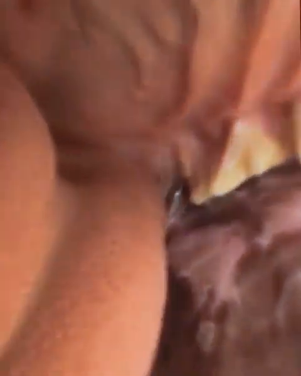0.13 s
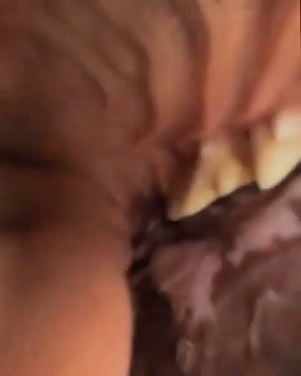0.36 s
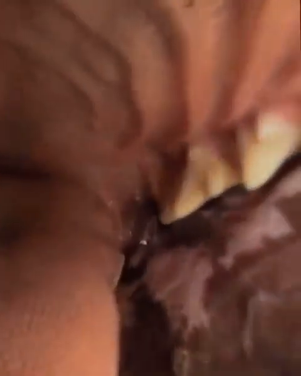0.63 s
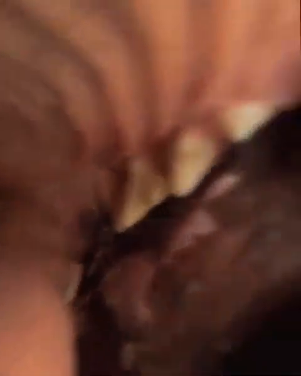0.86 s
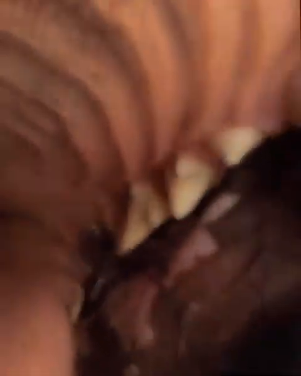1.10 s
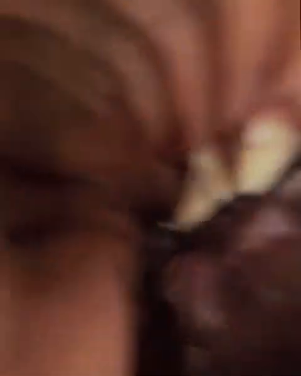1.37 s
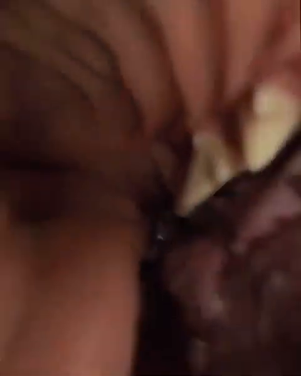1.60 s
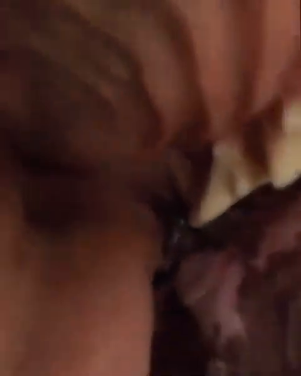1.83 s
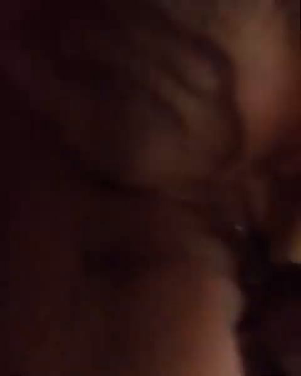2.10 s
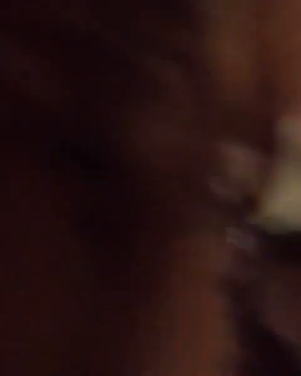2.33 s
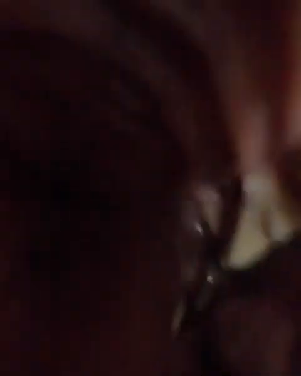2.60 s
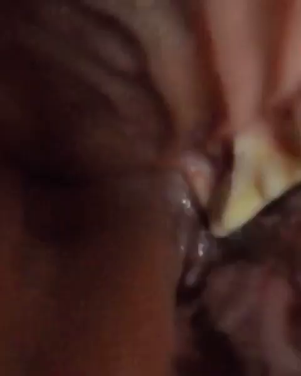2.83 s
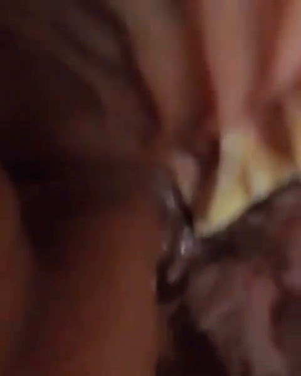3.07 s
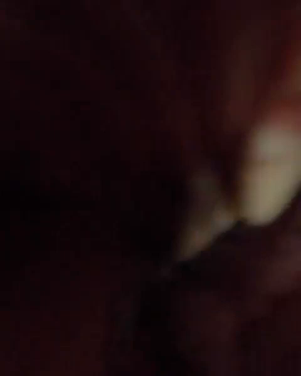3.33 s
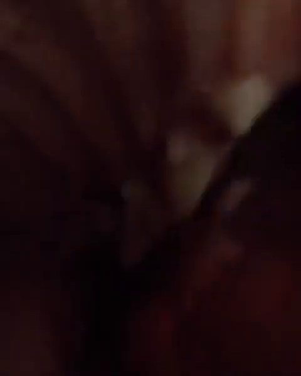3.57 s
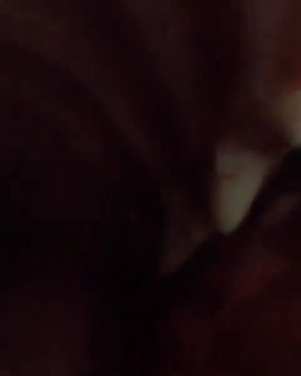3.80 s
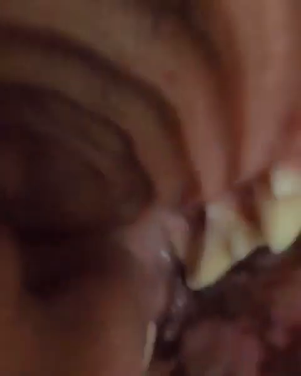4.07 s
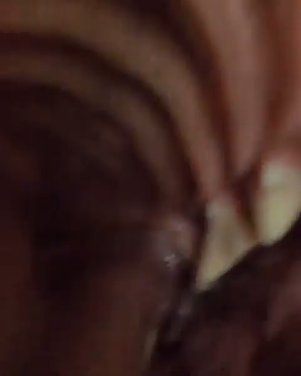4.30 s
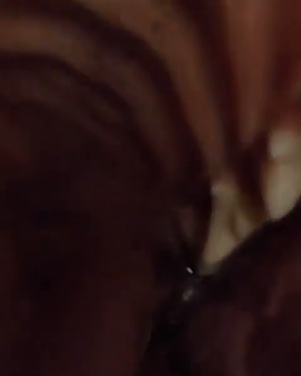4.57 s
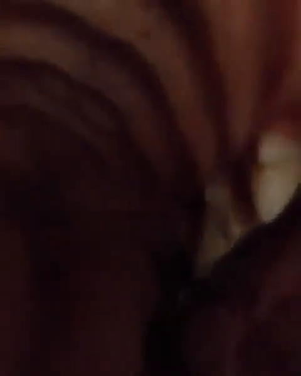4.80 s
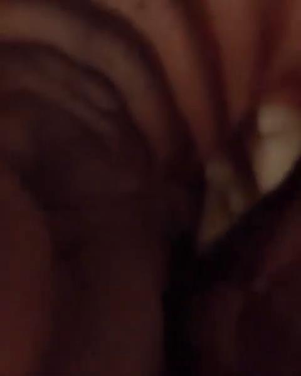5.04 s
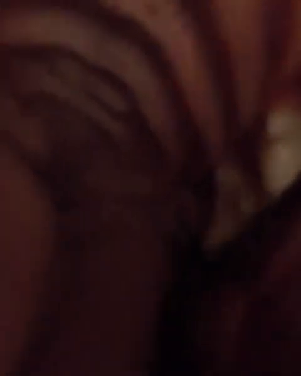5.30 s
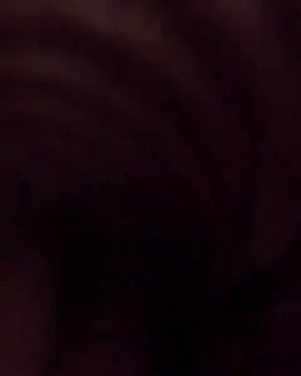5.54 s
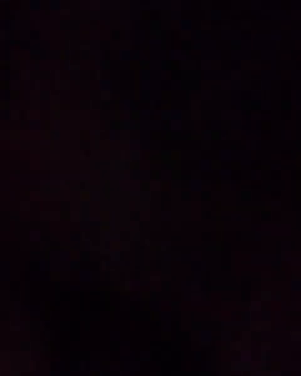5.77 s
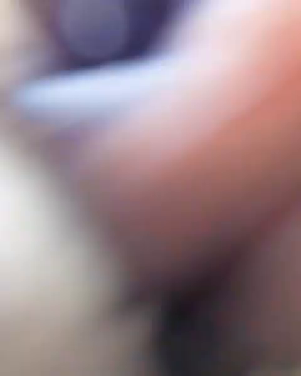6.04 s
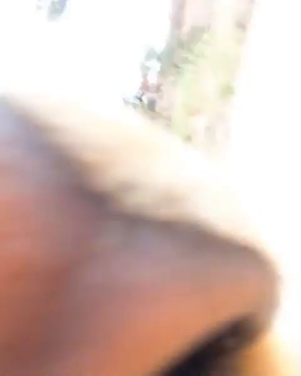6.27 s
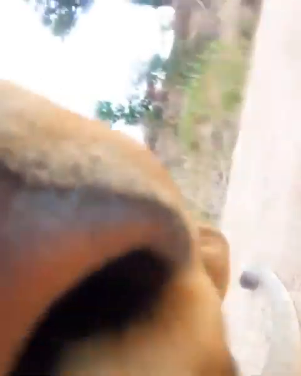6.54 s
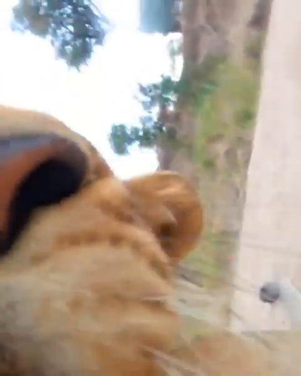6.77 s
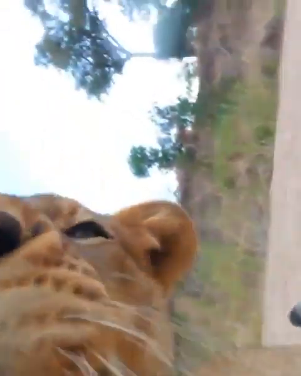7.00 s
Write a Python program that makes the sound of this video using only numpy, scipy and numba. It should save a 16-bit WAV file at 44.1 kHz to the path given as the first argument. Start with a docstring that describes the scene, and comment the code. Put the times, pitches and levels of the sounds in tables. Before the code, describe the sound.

A big cat mouths a small plastic case with the microphone inside, so everything is close, muffled and physical. From 0 to 0.2 s, rapid tooth ticks and a gritty wet scrape; a squelchy spurt follows, then hard clacks at 0.34 and 0.44. Softer isolated bumps lead to a crunchy cluster at 1.45-1.7. After a few knocks, heavy biting begins at 2.2, with the loudest hollow, ringing crack at 2.44 and more blows to 2.9. A lull, then boxy knocks from 3.2 to 3.8 and a big thump at 4.14. Around 4.37 a tiny tooth squeak glides down and up amid wet rubbing. Another pause; a sharp crack at 5.03, fizzy wheezes and squelches, then a flurry of thuds at 5.7-6.0. A final thump at 6.24 releases the case; faint low outdoor air remains, with slight brushes near 6.8 and 7.06.

```python
"""Teeth knock and tick on the plastic case of a small camera held in a big cat's mouth; wet flesh rubs,
squelches and wheezes on it, one tooth squeaks, faint outdoor air lies underneath. Blows ring damped
shell modes, rubs are stick-slip noise in resonances, wheezes are narrow noise spurts, the squeak is
a gliding harmonic stack. One muffled microphone with a fast limiter feeds both channels, whose treble
differs a little in short patches."""
import sys
import numpy as np
from scipy import signal
from scipy.fft import rfft, irfft, next_fast_len
from scipy.io import wavfile
from scipy.ndimage import uniform_filter1d, map_coordinates
from numba import njit

SR = 44100
rng = np.random.default_rng(int(sys.argv[2]) if len(sys.argv) > 2 else 0)


def nominal_scale(level):
    """Amplitude ratio for a level in decibels (scalar or array-like)."""
    x = np.asarray(level, float) / 20
    return 10 ** x


def inscribe(sig):
    """Save sig as 16-bit PCM at rate SR to the path in sys.argv[1].

    A 1-D sig is mono; a 2-D sig holds one channel per row.
    Samples are clipped to [-1, 1] before scaling.
    """
    pcm = np.round(np.clip(np.atleast_2d(sig).T, -1, 1) * 32767)
    wavfile.write(sys.argv[1], SR, pcm.astype(np.int16))


N = 314864

# shell and port under a fast rub: f/Hz, width per pass/Hz, relative level/dB
SCRAPE_PEAKS = [(3046, 740, -2.5), (3950, 760, 10.5), (4546, 1600, 6), (5370, 1240, 2.5),
                (6660, 1800, -19.5)]
# wet mouth cavity: f/Hz, width per pass/Hz, relative level/dB
SQUELCH_PEAKS = [(908, 264, 5), (1554, 366, 6), (2020, 660, 3.5), (2590, 940, -11.5)]


def unit(x):
    """Scale to rms 1."""
    return x / np.sqrt(np.mean(x ** 2) + 1e-20)


def curves(rows):
    """One value per sample for each column after the time."""
    t_s, *columns = np.transpose(rows)
    return [np.interp(np.arange(N) / SR, t_s, column) for column in columns]


def wobble(knots_per_s):
    """Smooth random curve through normal draws."""
    knots = rng.standard_normal(int(N * knots_per_s / SR) + 4)
    return map_coordinates(knots, [np.arange(N) * knots_per_s / SR])


def filtered(x, response):
    """x through a complex response of frequency in Hz."""
    size = next_fast_len(N + 8192)  # room for ringing
    return irfft(rfft(x, size) * response(np.fft.rfftfreq(size, 1 / SR)), size)[:N]


def coloured(points):
    """Noise of rms 1, spectrum given as (Hz, dB)."""
    f_hz, level_db = np.transpose(points)

    def response(f):
        return nominal_scale(np.interp(np.log(f + 1), np.log(f_hz), level_db, left=-120, right=-120))

    return unit(filtered(rng.standard_normal(N), response))


def resonated(x, peaks):
    """x at rms 1 through a bank of resonances passed twice, for steep skirts."""
    def response(f):
        bank = 0
        for k, (f_hz, width_hz, level_db) in enumerate(peaks):
            loss = 1j * f * width_hz
            bank = bank + (-1) ** k * nominal_scale(level_db / 2) * loss / (f_hz * f_hz - f * f + loss)
        return bank ** 2

    return unit(filtered(x, response))


def blows(times_s, contact_ms, bands_hz, bands_db, crack_db):
    """Each blow is a short crunch of slips, heard dry and ringing in the shell modes."""
    # shell modes: f/Hz, relative level/dB, undamped t60/s
    case_modes = [(84.4, -2, 0.04), (153.3, 4, 0.018), (365.5, 3, 0.02), (534.5, 4.5, 0.032),
                  (958, -8, 0.029), (1200, -2, 0.0072), (1663, -28, 0.13), (2246, -5.5, 0.0053),
                  (3397, 6, 0.0042), (3727, -11.5, 0.015), (4630, -23.5, 0.0017), (6500, -14, 0.00098),
                  (10600, 7, 0.0022)]
    # only the teeth hold the shell, so its long mode sings on: from/s, to/s, gain/dB
    free_spans = [(2.15, 2.75, 13), (3.64, 3.7, -4)]
    mode_scatter_db = 2.5  # from blow to blow
    f_hz, mode_db, t60_s = np.transpose(case_modes)[:, :, None]
    out = np.zeros(N + SR)
    t = np.arange(SR // 10) / SR
    lead = SR // 50  # room for the contact to build up
    log_bands = np.log(bands_hz)
    log_grid = np.log(np.fft.rfftfreq(2 * lead, 1 / SR) + 1)
    draws = rng.standard_normal((len(times_s), 2, len(case_modes), 1))
    crunch = rng.standard_normal((len(times_s), 2 * lead))
    for s, ms, levels_db, (scatter, detune), slips in zip(times_s, contact_ms, bands_db, draws, crunch):
        gains_db = [gain for start, end, gain in free_spans if start < s < end]
        ring_db = mode_db + np.interp(np.log(f_hz), log_bands, levels_db)
        ring_db = ring_db + mode_scatter_db * scatter + sum(gains_db) * (t60_s > 0.05)
        damped_s = t60_s if gains_db else np.minimum(t60_s, 0.04)  # otherwise flesh lies on it
        # the grip detunes the modes that it damps
        ring = nominal_scale(-60 * t / damped_s) * np.sin(2 * np.pi * (f_hz + 0.95 * detune / t60_s) * t)
        ring *= (1 - np.exp(-0.9 * f_hz * t)) ** 3  # soft, wet contact: swells over a cycle or two

        age = np.arange(-lead, lead) / (ms * SR / 1000)
        force = slips * np.exp(np.minimum(2 * age, -age))  # builds twice as fast as it lets go
        ring = signal.fftconvolve(ring, force[None], axes=1)
        ring *= nominal_scale(ring_db) / np.abs(ring).max(1, keepdims=True)
        crack = irfft(rfft(force) * nominal_scale(np.interp(log_grid, log_bands, levels_db)))
        crack *= nominal_scale(crack_db) / np.abs(force).max()

        start = round(s * SR)
        out[start:][:ring.shape[1]] += ring.sum(0)
        out[start:][:2 * lead] += crack
    return out[lead:lead + N]


def knocks():
    """Jaw blows: strong thump and mid modes, treble falling away."""
    # t/s, base level/dB, thump re base/dB, edge re base/dB, contact (twice the decay constant)/ms
    knock_rows = [(0.206, -19, -5, 5, 2.5), (0.3387, -33, -13, 5.5, 26), (0.439, -12.5, 0.5, -13, 1.3),
                  (0.5435, -24.5, -4, 4, 1.9), (0.761, -30, 8.5, -47, 1.75), (0.9604, -28.5, 2.5, 9, 1.5),
                  (1.137, -36.5, 12, -14, 2), (1.1778, -38, 12.5, -36, 1.2), (1.4553, -25, 8.5, -17, 18.3),
                  (1.4833, -20, 4.5, -11.5, 9.1), (1.542, -14.5, 1, -40, 0.98),
                  (1.5788, -18, 6.5, -11, 4.7), (1.6235, -14.5, 5, -24, 3.6), (1.637, -24.5, -6, -17, 16),
                  (1.663, -19.5, 12.5, -12.5, 2.1), (1.865, -17, -4, -1.5, 1.1), (2.034, -22, 5.5, -2, 4),
                  (2.0651, -24, -2, -25, 7.9), (2.2278, -11, -8, -37, 6.5), (2.2398, -20.5, -25, -10, 2),
                  (2.3107, -17, -3.5, -8, 5.2), (2.402, -18, -14, -6.5, 4.5), (2.4397, -2, -2, -10, 0.47),
                  (2.446, -3, -27, -10, 5.6), (2.4885, -12, -1, -7, 2.8), (2.646, -15, -7, -22, 0.52),
                  (2.6881, -15.5, -0.5, -37, 3.8), (2.704, -14, -6, -8.5, 10.3), (2.7724, -23, 4, 9, 11),
                  (2.8062, -11.5, -3.5, -6, 2.7), (2.8342, -24.5, -4, -5, 2.9),
                  (2.8639, -16, -1.5, -6.5, 3.7), (3.2058, -29, 7, -17, 7.6), (3.3, -33, 10, -37, 2.7),
                  (3.346, -18.5, -0.5, -16.5, 4.8), (3.356, -32, -7, 6, 7.1),
                  (3.4502, -11, 3.5, -19.5, 5.5), (3.5724, -12, -3.5, -66, 7.7),
                  (3.631, -14, -0.5, -11, 14), (3.636, -11.5, -9, -9, 15), (3.652, -8.5, -1.5, -8, 8.9),
                  (3.744, -17, 2.5, -36, 4.2), (3.752, -28.5, -18, -6, 6.6), (3.825, -28.5, 3, -47, 11),
                  (3.9562, -19, -4.5, -13, 4.7), (4.0086, -16, 2, -8.5, 1.2), (4.137, -2.5, 0, -5.5, 8.1),
                  (4.1867, -17, -14, -5, 1.6), (4.2253, -21.5, -14, -6, 6), (4.2496, -21, -4, -17, 13),
                  (4.271, -13, -4, -7.5, 2.6), (4.414, -16, -0.5, -3, 8.7), (4.4306, -14, -8, -43, 1.5),
                  (4.972, -15, 3, -9, 11), (5.0295, -19, -3, 6, 22), (5.205, -18, -21, -12, 7.8),
                  (5.327, -20.5, -19, -1, 0.77), (5.3419, -10, -5.5, -7.5, 1.5), (5.5624, -22, -6, -6, 1.1),
                  (5.7062, -11.5, 2, -10, 2.5), (5.7345, -11.5, -3, -12, 2.6), (5.7865, -22, 5, -51, 4.2),
                  (5.803, -16.5, 8, -0.5, 15), (5.834, -18.5, 2, -15, 3.8), (5.872, -12, 4, -55, 3),
                  (5.9226, -21, -6, -4.5, 4.3), (5.961, -7.5, -8.5, -20, 15), (5.972, -11, -3, -4.5, 7),
                  (6.05, -28.5, 7, -0.5, 43), (6.2359, -12, 2, -9, 16), (6.2709, -24.5, 4.5, -2.5, 17),
                  (6.346, -33.5, -10, -47, 6)]
    s, db, thump, edge, ms = np.transpose(knock_rows)
    bands_hz = [190, 340, 950, 1900, 4500, 9000]
    bands_db = np.transpose([db + thump, db - 5.0, db - 8.0,
                             db + edge + 3.5, db + edge - 25.0, db + edge - 56.5])
    return blows(s - 0.0027, 0.5 * ms, bands_hz, bands_db, crack_db=10.0)


def ticks():
    """Tooth tips: hard short contacts that reach the high modes."""
    # t/s, base level/dB, body re base/dB, sharpness re base/dB
    tick_rows = [(0.014, -23, -13, -26.5), (0.022, -13, 8.5, -29), (0.0248, -19, 5, -26),
                 (0.0277, -21.5, -4.5, -18.5), (0.0652, -16.5, -10, -28), (0.0752, -24, 0, -29),
                 (0.0905, -34, 5, -22), (0.145, -19, 8, -37), (0.1716, -17, 2, -21.5),
                 (0.1781, -19.5, 4, -19.5), (0.0569, -17.5, 8.5, -34), (0.337, -7, -21, -6),
                 (0.4383, -22.5, 16.5, -9), (0.545, -20.5, -9, -1), (0.557, -26, 4.5, 0.5),
                 (1.0324, -22, 0, -4.5), (1.134, -36, -15, -13), (1.4425, -19.5, -13.5, -24),
                 (1.4535, -5, -3.5, -23), (1.479, -24.5, 15, -13.5), (1.4938, -22, -23, -21),
                 (1.51, -13.5, -37, -15.5), (1.553, -14, -36, -11), (1.5882, -22, 9.5, -12),
                 (1.6312, -30, 17, -37), (1.868, -40, 5, -10), (2.1, -34, 9, -2.5), (2.2259, -16, -4, -27),
                 (2.3048, -26, 8.5, -17), (2.703, -29, 16, -35), (2.7113, -23, 2, -7),
                 (2.77, -17.5, -10, -13), (3.2059, -38, 20, -36), (3.349, -24.5, 11, -84),
                 (3.647, -18.5, 18, -46), (4.126, -22.5, -14, -15), (4.4263, -19.5, -21, -25.5),
                 (5.0166, -16, -18, -14), (5.0264, -3.5, 12, -26), (5.339, -18, 3, -14),
                 (5.5611, -27.5, 6, -23), (5.7104, -23.5, -1, -4.5), (5.729, -24, 5, -5.5),
                 (5.806, -15.5, -8, -32), (5.8387, -23.5, 9, -37), (5.9652, -18.5, -4, -8.5),
                 (6.036, -35, 20, 4), (6.233, -46, -3, 4), (1.297, -49.5, 10, -4.5), (3.175, -44, 12, -14),
                 (4.743, -50, 15, -22.5), (4.26, -31, -11, -28), (6.928, -50, 5, -4), (7.024, -57, 4, -29)]
    s, db, body, sharp = np.transpose(tick_rows)
    bands_hz = [500, 1700, 3000, 5000, 6800, 10500, 14000]
    bands_db = np.transpose([db + body - 24.0, db + body - 0.5, db - 8.5, db - 0.5,
                             db + sharp, db + sharp - 29.0, db + sharp - 41.5])
    return blows(s - 0.0004, np.full(len(s), 0.6), bands_hz, bands_db, crack_db=8.0)


def moves(rows, rise_db_per_s, fall_db_per_s):
    """Gain curve per level column: every move swells, holds for its length and fades."""
    s, length, *levels_db = np.transpose(rows)[:, :, None]
    t = np.arange(0, N + 128, 64) / SR
    loss_db = np.maximum(rise_db_per_s * (s - t), fall_db_per_s * (t - s - length))
    loss_db = np.maximum(0, loss_db)
    gains = [np.sqrt((nominal_scale(db - loss_db) ** 2).sum(0)) for db in levels_db]  # overlaps add in power
    return [np.interp(np.arange(N) / SR, t, gain) for gain in gains]


def rubbed(peaks, clumps_per_s, depth_db):
    """Stick-slip: noise clumped at two rates, through resonances."""
    clumping_db = depth_db * wobble(clumps_per_s) + depth_db * wobble(clumps_per_s * 5)
    return resonated(rng.standard_normal(N) * nominal_scale(clumping_db), peaks)


def grit():
    """Saliva threads snap and grit catches: sparse uneven pops in mouth and shell resonances."""
    pops_per_s, spread_db = 700, 3.5
    when, size, sign = rng.random((round(pops_per_s * N / SR), 3)).T
    heights = nominal_scale(-spread_db * np.log(size + 0.03)) * np.sign(sign - 0.5)
    pops = np.bincount((when * N).astype(int), heights, N)
    pops = pops * nominal_scale(2.5 * wobble(90))  # clumps
    return resonated(pops, SQUELCH_PEAKS), resonated(pops, SCRAPE_PEAKS)


def mouthing():
    """Flesh pumps the port, drags the shell slowly, squelches, scrapes it fast, and saliva fizzes."""
    # firmness of the mouth on the shell between movements: t/s, pressure/dB, rub/dB
    hold_rows = [(0, -40.5, -44), (.5, -31, -54.5), (.66, -57.5, -66.5), (.9, -38, -49),
                 (1.3, -40.5, -68.5), (1.6, -56, -54.5), (1.82, -30, -59.5), (2.3, -31, -48),
                 (2.75, -14, -49), (3.13, -38, -61), (3.5, -29, -51), (3.92, -37.5, -62),
                 (4.2, -27.5, -39.5), (4.75, -29.5, -61.5), (5.3, -32, -51), (6.1, -34, -52.5),
                 (6.45, -66, -69), (7.14, -46, -96)]
    # flesh pushes on the port and drags the shell along: t/s, length/s, pressure/dB, drag/dB
    push_rows = [(.04, 0.17, -36.5, -33), (.21, 0.0034, -22, -26.5), (.26, 0.081, -27, -42),
                 (.35, 0.097, -21.5, -32.5), (.54, 0.023, -24.5, -31), (.76, 0.017, -32.5, -33),
                 (1.03, 0.094, -31, -36.5), (1.17, 0.017, -55, -73), (1.36, 0.026, -30.5, -47),
                 (1.46, 0.22, -19.5, -30.5), (1.74, 0.017, -16.5, -42), (1.86, 0.01, -43, -53),
                 (2.03, 0.031, -43, -29.5), (2.22, 0.034, -17.5, -39.5), (2.39, 0.12, -18, -33.5),
                 (2.55, 0.014, -16.5, -46), (2.65, 0.27, -26.5, -36), (3.19, 0.093, -26, -69),
                 (3.34, 0.044, -24.5, -55), (3.45, 0.069, -16.5, -28), (3.62, 0.049, -23, -46.5),
                 (3.75, 0.014, -29, -29.5), (4.0, 0.04, -19.5, -33.5), (4.09, 0.098, -15.5, -28),
                 (4.23, 0.054, -20, -31.5), (4.34, 0.148, -22, -35.5), (4.95, 0.12, -18, -67.5),
                 (5.13, 0.14, -23.5, -78), (5.27, 0.12, -19, -53), (5.48, 0.0089, -21.5, -51),
                 (5.56, 0.044, -31, -42.5), (5.705, 0.019, -23, -16), (5.8, .05, -36, -21),
                 (5.92, 0.062, -16.5, -26), (6.165, 0.018, -22, -33.5), (6.23, 0.057, -22, -61),
                 (6.78, 0.036, -21.5, -41), (7.06, 0.089, -54, -54.5)]
    # tongue and gums slide over the shell: t/s, length/s, squelch/dB, scrape/dB, wet fizz/dB
    stroke_rows = [(.022, 0.011, -33.5, -34.5, -81), (.052, 0.014, -30, -37, -90),
                   (.09, 0.023, -42.5, -44, -85), (.142, 0.063, -35, -36.5, -80),
                   (.21, 0.249, -63, -51, -72), (.32, 0.11, -54.5, -63, -58.5),
                   (.54, 0.026, -44.5, -43, -61), (.75, 0.061, -52, -50, -68.5),
                   (.84, .23, -57.5, -57.5, -66), (1.1, 0.031, -52.5, -59.5, -95),
                   (1.45, 0.056, -43, -39.5, -86), (1.53, 0.021, -42, -37, -55),
                   (1.57, 0.067, -52, -47.5, -90), (1.67, 0.027, -48.5, -45, -102),
                   (2.0, 0.155, -54.5, -57, -81), (2.21, 0.033, -45, -43, -74.5),
                   (2.29, 0.145, -52.5, -52.5, -98.5), (2.62, 0.22, -49.5, -54, -79),
                   (3.4, 0.27, -50.5, -58.5, -103), (3.6, 0.079, -57.5, -65, -99),
                   (3.75, 0.077, -56.5, -68, -100), (4.02, 0.07, -55, -64.5, -86.5),
                   (4.18, 0.042, -55, -51.5, -74), (4.35, 0.081, -39.5, -46, -83.5),
                   (4.42, 0.077, -48.5, -51, -102), (4.9, 0.1, -49.5, -67, -111.5),
                   (5.22, 0.14, -44.5, -56.5, -77), (5.45, 0.23, -59.5, -54, -75),
                   (5.61, 0.26, -49.5, -51, -81.5), (5.69, .05, -39.5, -43, -59.5),
                   (5.76, 0.17, -44, -52, -73), (5.9, 0.1, -45, -62.5, -96),
                   (6.035, 0.0078, -36.5, -56, -88), (6.17, 0.12, -57.5, -70, -88),
                   (6.76, .12, -63.5, -64, -82), (7.06, 0.09, -67, -87, -99)]
    # pressure noise: f/Hz, relative density/dB
    pressure_points = [(12, -30.5), (25, 2.5), (45, -2.5), (80, -2.5), (130, -14), (250, -28.5),
                       (600, -31.5)]
    # shell under a slow rub: f/Hz, width per pass/Hz, relative level/dB
    drag_peaks = [(207, 132, -1), (372, 134, 5.5), (499.6, 312, -3)]
    # saliva fizz: f/Hz, relative density/dB
    fizz_points = [(5000, -28.5), (7500, -8), (9000, -14.5), (11000, -9), (12800, -19.5), (13600, -50)]
    rest_drag_db, rest_scrape_db = 7, -7.5  # re rub
    rest_fizz_db, grit_db = -102, 3  # grit re stroke

    hold_db, rub_db = curves(hold_rows)
    pushing, dragging = moves(push_rows, rise_db_per_s=510, fall_db_per_s=423)
    squelching, scraping, fizzing = moves(stroke_rows, rise_db_per_s=610, fall_db_per_s=890)
    grip = wobble(25)  # changes of grip reach all five noise layers at once

    pump = np.hypot(pushing, nominal_scale(hold_db)) * nominal_scale(1.0 * grip)
    pump *= coloured(pressure_points)
    drag = np.hypot(dragging, nominal_scale(rub_db + rest_drag_db)) * nominal_scale(2.0 * grip)
    drag *= rubbed(drag_peaks, clumps_per_s=40, depth_db=3.5)
    squelch = np.hypot(squelching, nominal_scale(rub_db)) * nominal_scale(1.4 * grip)
    squelch *= rubbed(SQUELCH_PEAKS, clumps_per_s=21, depth_db=5.5)
    scrape = np.hypot(scraping, nominal_scale(rub_db + rest_scrape_db)) * nominal_scale(1.8 * grip)
    scrape *= rubbed(SCRAPE_PEAKS, clumps_per_s=88, depth_db=2.5)
    fizz = np.hypot(fizzing, nominal_scale(rest_fizz_db)) * nominal_scale(4.6 * grip + 1.1 * wobble(72))
    fizz *= coloured(fizz_points)

    mouth_pops, shell_pops = grit()
    pops = nominal_scale(grit_db) * (squelching * mouth_pops + scraping * shell_pops)
    return pump + drag + squelch + scrape + fizz + pops


def wheezes():
    """Air and saliva squeezed through a gap at the shell: spurts of gritty noise around one pitch."""
    # t/s, length/s, pitch/Hz, width/Hz, starting level/dB
    wheeze_rows = [ (0.008, 0.031, 5040, 1300, -37), (0.05, 0.055, 5010, 1300, -40),
                   (0.142, 0.087, 5330, 1500, -44), (5.6, 0.31, 5630, 2400, -52.5),
                   (0.193, 0.022, 1030, 305, -19), (0.216, 0.057, 1140, 150, -40.5),
                   (0.319, 0.042, 6640, 494, -43), (1.434, 0.08, 5600, 905, -41.5),
                   (1.478, 0.019, 3050, 900, -37), (1.5, 0.023, 3900, 1200, -24),
                   (1.706, 0.0095, 890, 500, -29.5), (2.205, 0.061, 5000, 3000, -43.5),
                   (2.818, 0.37, 3730, 503, -62), (4.105, 0.05, 3950, 2500, -38.5),
                   (4.366, 0.038, 5630, 3500, -41.5), (5.007, 0.04, 6140, 695, -49.5),
                   (5.008, 0.048, 3540, 2020, -33), (5.074, 0.056, 3120, 300, -45.5),
                   (5.078, 0.039, 3880, 700, -48), (5.131, 0.04, 3640, 700, -43),
                   (5.287, 0.023, 3950, 500, -35), (5.44, 0.033, 3950, 500, -37.5),
                   (5.491, 0.03, 3950, 450, -39.5), (5.519, 0.16, 4040, 450, -49),
                   (5.44, 0.09, 4970, 900, -54), (5.441, 0.15, 878, 254, -37.5),
                   (5.991, 0.044, 746, 80, -28), (5.995, 0.016, 2420, 250, -34),
                   (6.733, 0.045, 1760, 3040, -49.5), (6.768, 0.18, 6500, 5000, -59),
                   (6.901, 0.1, 4900, 2500, -68), (7.057, 0.0089, 1070, 500, -46.5)]
    sag_db = 3  # loss over its length as each spurt empties
    size = SR // 4
    t = np.arange(size) / SR
    f = np.fft.rfftfreq(size, 1 / SR)
    out = np.zeros(N + SR)
    noise = rng.standard_normal((len(wheeze_rows), size))
    spitting = signal.resample(rng.standard_normal((len(wheeze_rows), 50)), size, axis=1)
    noise *= nominal_scale(2.5 * spitting)  # bubbles bursting
    for (s, length_s, pitch_hz, width_hz, db), row in zip(wheeze_rows, noise):
        band = 1 / (1 + ((f - pitch_hz) / (width_hz / 2)) ** 4)
        spurt = unit(irfft(rfft(row) * band, size))
        fades = np.clip(np.minimum(t / 0.0022, (length_s - t) / (0.22 * length_s)), 0, 1)
        out[round(s * SR):][:size] += nominal_scale(db - sag_db * t / length_s) * spurt * fades
    return out[:N]


def squeak():
    """A tooth slides in regular slips: a short gliding stack of harmonics."""
    # t/s, mean slip rate/Hz, relative level/dB
    slip_rows = [(4.36, 1670, -16.5), (4.367, 1320, -23), (4.378, 1129, -24.5), (4.391, 1080, -25),
                 (4.4, 1297, -28), (4.417, 1690, -29)]
    slip_hz, db = curves(slip_rows)
    t = np.arange(N) / SR
    sliding = np.clip(np.minimum(t - slip_rows[0][0], slip_rows[-1][0] - t) / 0.0031, 0, 1)
    phase = 2 * np.pi * np.cumsum(slip_hz * (1 + 0.03 * wobble(500))) / SR
    stack = np.zeros(N)
    for harmonic, harmonic_db in enumerate([3, -7, -7, -14], start=1):
        stack += nominal_scale(harmonic_db + 3.5 * wobble(300)) * np.sin(harmonic * phase)
    # the shell passes little above its top resonance
    stack = filtered(stack, lambda f: 1 / (1 + (f / 4300) ** 12))
    return sliding * nominal_scale(db + 4.0) * stack


def outdoor_air():
    """Faint steady noise, mostly low."""
    # f/Hz, relative density/dB
    air_points = [(15, -28.5), (25, 5.5), (238, -1.5), (434, -14), (1150, -11.5), (1800, -22), (2720, -19),
                  (3100, -19), (5500, -32.5), (13100, -71)]
    return nominal_scale(-56) * coloured(air_points)


def scene():
    """All sources at one microphone that feeds both channels; the level dips briefly once."""
    # t/s, half length/s, depth/dB
    dip = (2.199, 0.005, -22)
    mono = knocks() + ticks() + mouthing() + wheezes() + squeak() + outdoor_air()
    s, half_s, db = dip
    mono = mono * nominal_scale(db * np.exp(-((np.arange(N) / SR - s) / half_s) ** 4))
    return np.array([mono, mono])


@njit
def held(level, top, fall):
    """Peak follower: jumps up at once, sinks slowly back to the threshold."""
    out, peak = np.empty_like(level), top
    for i in range(len(level)):
        peak = max(level[i], top + (peak - top) * fall)
        out[i] = peak
    return out


def limiter(dry):
    """Peaks over the threshold duck everything for a moment."""
    top, recovery_s = nominal_scale(-10.5), 0.1
    peak = held(np.abs(dry[0]), top, np.exp(-1 / (recovery_s * SR)))
    gain = (top / peak) ** 0.83
    return dry * uniform_filter1d(gain, size=256)


def flicker(mono):
    """Left-right difference: mostly treble, random phase, in short time-frequency patches."""
    # f/Hz, level re middle/dB
    apart_points = [(300, -84.5), (1000, -33.5), (2100, -35), (3900, -24.5), (7000, -3.5), (12000, -7)]
    hz, _, spectrum = signal.stft(mono, SR, nperseg=1024)
    f_hz, level_db = np.transpose(apart_points)
    field = uniform_filter1d(rng.standard_normal(spectrum.shape), size=60, axis=0)
    field = uniform_filter1d(field, size=4, axis=1)
    level = nominal_scale(np.interp(np.log(hz + 1), np.log(f_hz), level_db))[:, None]
    patches = level * (unit(field) > -0.1)
    turned = np.exp(2j * np.pi * rng.random(spectrum.shape))
    return signal.istft(spectrum * patches * turned, SR, nperseg=1024)[1][:N]


def top_cut(x):
    """Nothing passes above the cut-off."""
    return signal.sosfilt(signal.butter(12, 13240, fs=SR, output="sos"), x)


def record(dry):
    """Limits the microphone signal and spreads its treble slightly."""
    limited = limiter(dry)
    mix = limited + np.outer([1, -1], flicker(limited[0]))
    return top_cut(mix)


dry = scene()
out = record(dry)
inscribe(out)
```